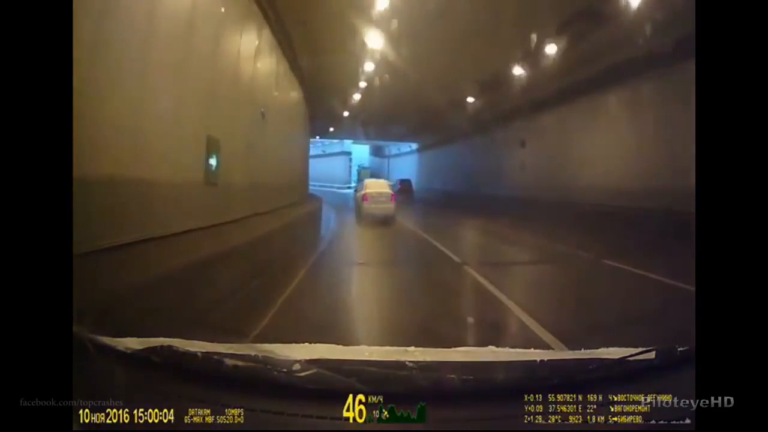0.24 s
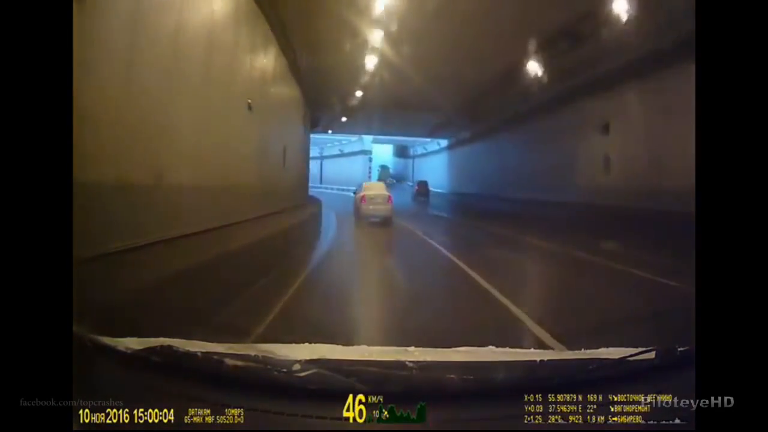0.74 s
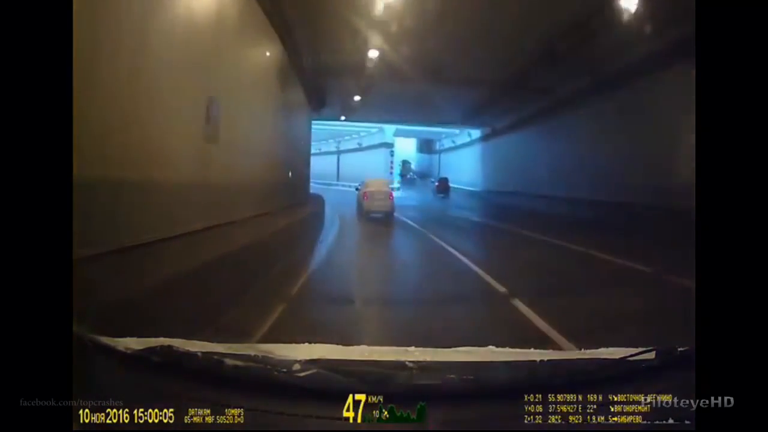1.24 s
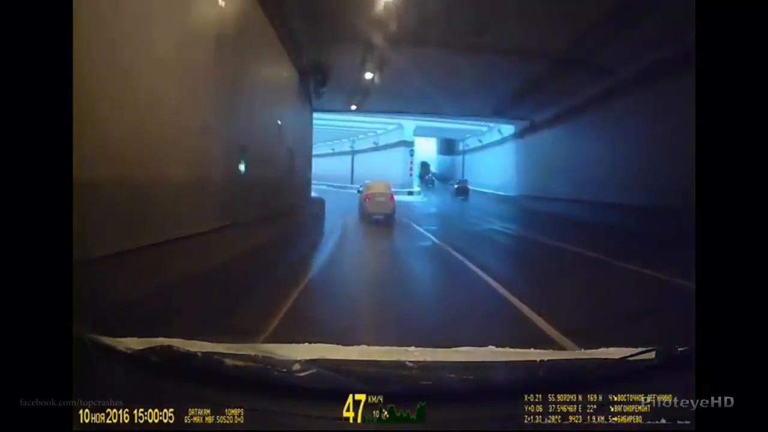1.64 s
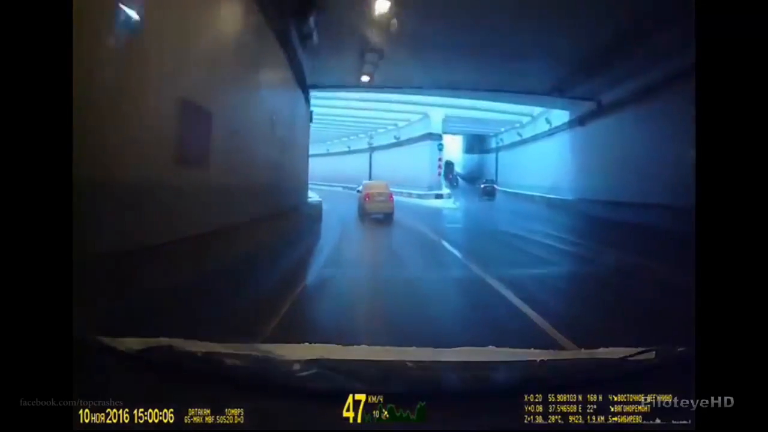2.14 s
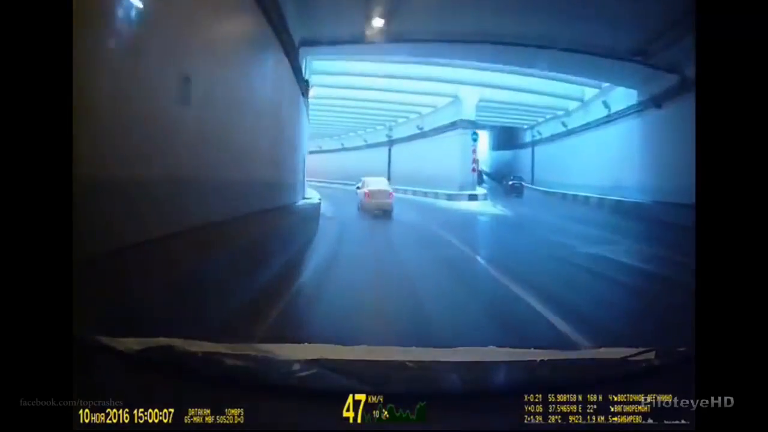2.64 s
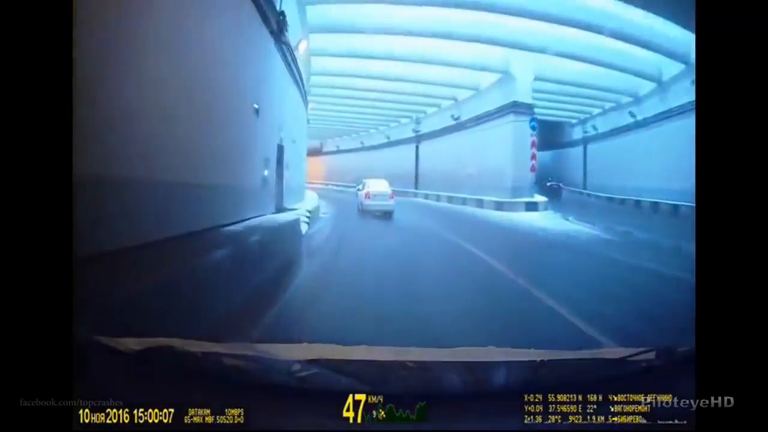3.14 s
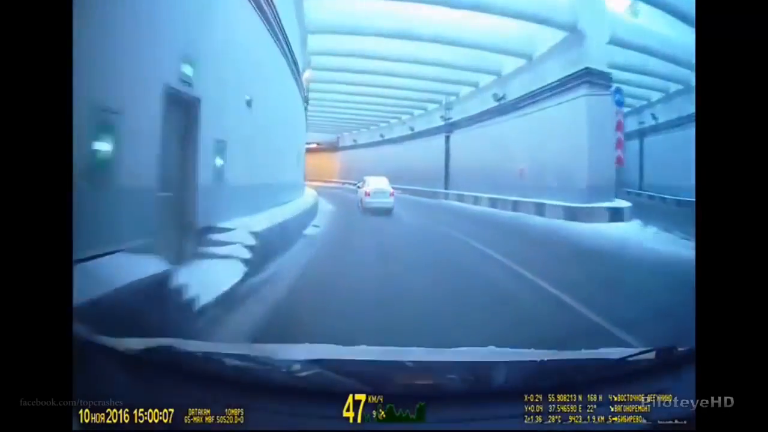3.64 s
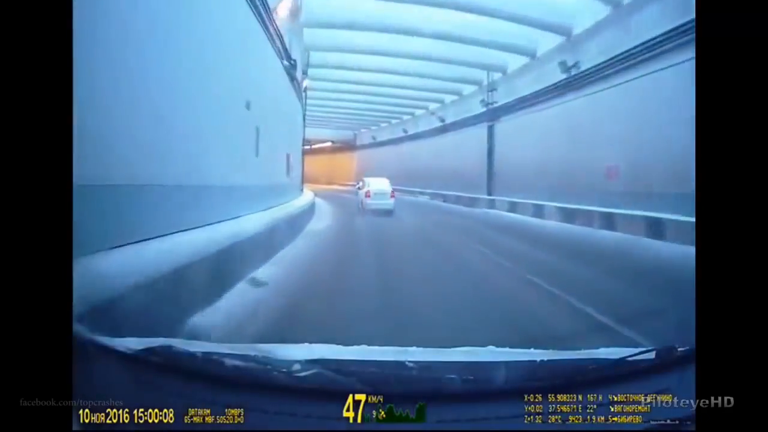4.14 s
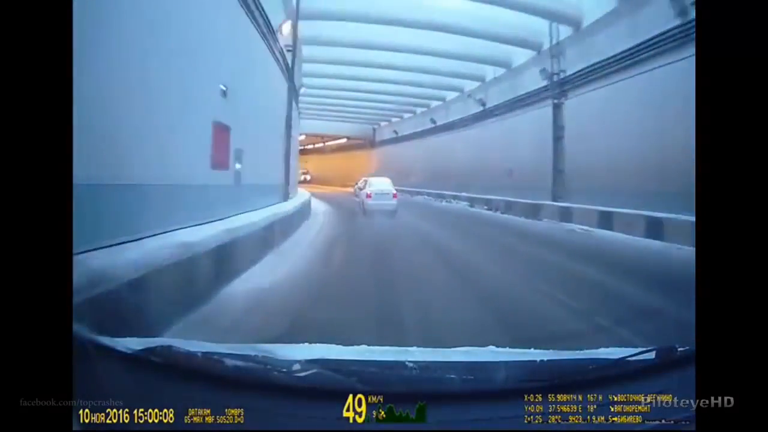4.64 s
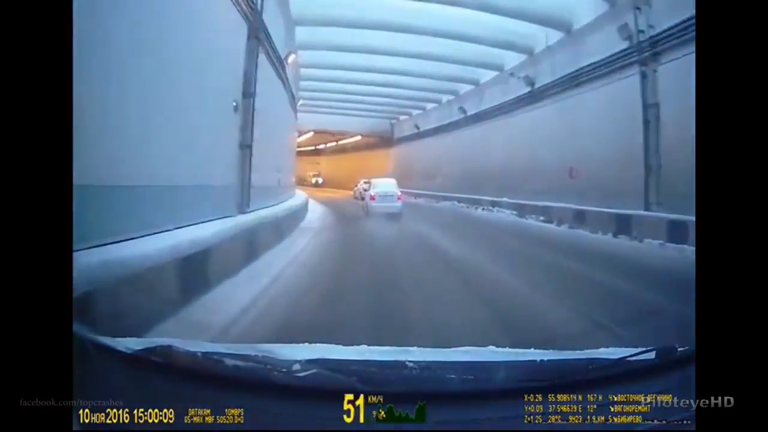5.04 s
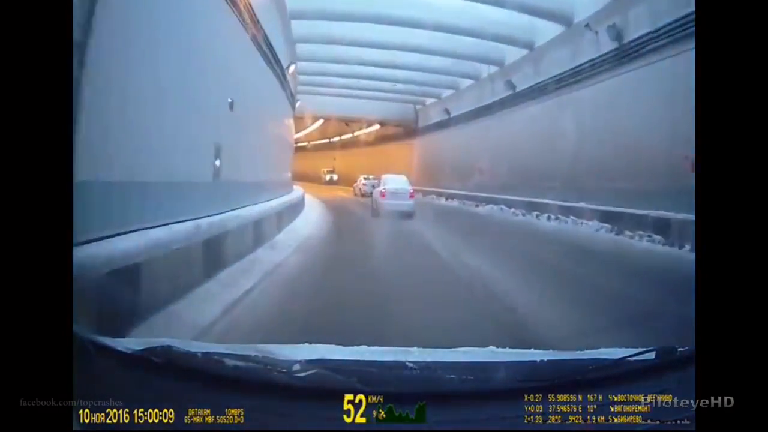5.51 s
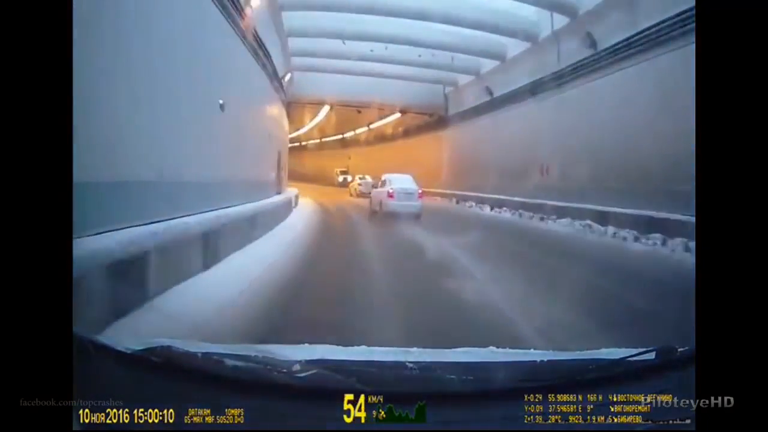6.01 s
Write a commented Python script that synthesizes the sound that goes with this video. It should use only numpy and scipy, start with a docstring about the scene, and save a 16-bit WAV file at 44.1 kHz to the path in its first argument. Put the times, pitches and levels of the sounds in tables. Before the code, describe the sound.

A car drives through a road tunnel for about six seconds, heard from inside the cabin. A bass-heavy, muffled tyre roar runs throughout, easing only very slightly. With it goes a deep engine hum that holds nearly the same pitch while slowly wavering in strength, and the cylinders tick faintly underneath. From about 0.8 to 1.4 seconds both axles cross a road joint: a quick cluster of around six knocks with briefly ringing floor panels, suspension thuds and light trim rattles. The clearest knock falls at 1 second and the heaviest thud near 1.3 seconds. From 1 second a faint, low, fluttering drivetrain whine rises gently in pitch, fading out by about 4 seconds. The rumble continues evenly, and a short, soft low thud sounds at about 6.2 seconds, right at the end.

```python
"""A deep, wavering hum and a tyre roar fill a car rolling through a road tunnel. The hum is engine
orders and steady body tones; the roar is broadband noise coloured by the cabin's resonances. The
cylinders tick faintly. About a second in, both axles knock over a road joint, ringing floor panels,
thudding the suspension and rattling the trim. A drivetrain whine rises in pitch and fades, and a
short, soft low thud sounds at the very end."""
import sys
import numpy as np
from scipy import signal
from scipy.io import wavfile

SR = 44100
rng = np.random.default_rng(int(sys.argv[2]) if len(sys.argv) > 2 else 0)


def file_out(sig):
    """Save sig as 16-bit WAV at sys.argv[1]."""
    # one column per channel
    cols = np.atleast_2d(sig).T
    # limit, then scale
    lim = np.clip(cols, -1, 1)
    pcm = np.round(lim * 32767).astype(np.int16)
    wavfile.write(sys.argv[1], SR, pcm)


N = 276434
TIME = np.arange(N) / SR


def amp(db):
    """Amplitude ratio: a factor of ten for every 20 dB."""
    return 10 ** (np.asarray(db) / 20)


def unit_rms(x):
    """Normalisation to a mean power of one."""
    return x / np.sqrt(np.mean(x ** 2) + 1e-20)


def drift(rate_hz):
    """Low-passed noise: a slow random fluctuation with a spread of one."""
    hop, settle = 40, 2000
    pole = np.exp(-2 * np.pi * rate_hz * hop / SR)
    noise = rng.standard_normal(N // hop + settle + 2)
    slow = signal.lfilter([1], [1, -2 * pole, pole * pole], noise)[settle:]
    return np.interp(np.arange(N) / hop, np.arange(len(slow)), unit_rms(slow - slow.mean()))


def tone(cycles, rms_db):
    """Simple harmonic motion from a random starting phase."""
    return np.sqrt(2) * amp(rms_db) * np.sin(2 * np.pi * (cycles + rng.random()))


def band(x, low_hz, high_hz):
    """Band limiting by a Butterworth filter."""
    return signal.sosfilt(signal.butter(2, [low_hz, high_hz], "band", fs=SR, output="sos"), x)


def cabin(x):
    """Resonance in an enclosure: the cabin reinforces some bands and weakens others."""
    # cabin peaks and dips: centre_hz, width_hz, gain_db
    resonances = [(65, 10, -3.5), (112.4, 15, -5.5), (89, 69, 7), (140, 18, 5), (471, 344, 4),
                  (516, 8.5, -9.5), (591, 70, 4.5), (958, 250, 7), (1728, 303, 6.5), (2090, 150, -6),
                  (2180, 440, 2.5), (2876, 660, 5.5)]
    for centre_hz, width_hz, gain_db in resonances:
        w, a = 2 * np.pi * centre_hz / SR, np.sqrt(amp(gain_db))
        damping = np.sin(w) * width_hz / centre_hz / 2
        numerator = [1 + damping * a, -2 * np.cos(w), 1 - damping * a]
        denominator = [1 + damping / a, -2 * np.cos(w), 1 - damping / a]
        x = signal.lfilter(numerator, denominator, x)
    return x


def tyre_roar(start_db=-41.1, fall_db_per_s=0.2, flicker_db=0.99):
    """Transmission through the body: bass-heavy noise whose third octaves flicker alone and together."""
    # roar spectrum ahead of the cabin resonances: frequency_hz, relative_density_db
    spectrum = [(8, -5), (35, -7), (60, -16), (110, -19.5), (180, -27), (350, -30), (700, -34.5),
                (1050, -42.5), (1350, -47), (2100, -44), (3000, -49), (4000, -54), (5200, -61), (9400, -63)]
    frequency_hz, density_db = np.transpose(spectrum)
    edges_hz = 8 * 2 ** np.arange(0, 10.4, 1 / 3)
    together = drift(8)
    white = rng.standard_normal((2, N + SR))  # an extra second lets the filters settle
    roar = np.zeros(N)
    for k, (low, high) in enumerate(zip(edges_hz, edges_hz[1:])):
        band_db = np.interp(np.log(low * high) / 2, np.log(frequency_hz), density_db)
        flicker = 0.5 * together + drift(7.8)
        roar += amp(band_db + flicker_db * flicker) * band(white[k % 2], low, high)[SR:]
    return amp(start_db - fall_db_per_s * TIME) * unit_rms(cabin(roar))


def engine_hum(cycles, body_hz=32.9, waver_db=1.5):
    """Forced vibration at multiples of the cycle rate; a nearby body tone beats with the second order."""
    # wavering of the two strongest orders: time_s, first_order_db, second_order_db
    contour = [(0, -38, -39), (0.8, -35, -36), (1.2, -49, -36), (1.7, -45, -35), (2.2, -35, -42),
               (2.9, -35, -41), (3.4, -48, -37), (4.0, -42, -40), (4.4, -35, -43), (5.2, -46, -41),
               (5.8, -45, -37), (6.27, -45, -36)]
    # weaker engine orders: cycle_multiple, rms_db
    orders = [(1.5, -46), (3, -54), (4, -55), (5, -65), (6, -55), (7, -57)]
    time_s, *levels = np.transpose(contour)
    first_db, second_db = (np.interp(TIME, time_s, db) for db in levels)
    hum = tone(cycles, first_db) + tone(2 * cycles, second_db)
    hum += tone(body_hz * TIME, second_db - 3 + waver_db * drift(1.5))
    return hum + sum(tone(k * cycles, db + waver_db * drift(0.76)) for k, db in orders)


def steady_tones(waver_db=1.5):
    """Amplitude modulation: low body tones and a faint whistle hold their pitch and waver in level."""
    # vibrations of the car body: pitch_hz, rms_db
    body_tones = [(10.47, -48), (12.05, -52), (17.05, -42), (37.5, -52)]
    # high whistle: pitch_hz, rms_db
    whistle = [(7920, -93)]
    return sum(tone(hz * TIME, db + waver_db * drift(0.95)) for hz, db in body_tones + whistle)


def drivetrain_whine(start_s=1, start_hz=130.6, rise_hz_per_s=8.2, level_db=-54.5):
    """A linear frequency sweep: one fluttering tone climbs as it fades in, holds and fades out."""
    attack_s, hold_s, release_s = 0.27, 1.53, 1.15
    envelope = np.interp(TIME, np.cumsum([start_s, attack_s, hold_s, release_s]), [0, 1, 1, 0])
    pitch_hz = start_hz + rise_hz_per_s * (TIME - start_s)
    return envelope * tone(np.cumsum(pitch_hz) / SR, level_db + 3.3 * drift(7.3))


def engine_ticks(cycles, gain_db=-51.5, scatter_db=1.5, decay_s=0.0011):
    """Impulsive excitation: each cylinder gives a decaying noise burst, one louder than the rest."""
    # tick strength of each cylinder in firing order: relative_db
    cylinders = [0, -14, -18, -11, -16]
    firing = np.floor(cycles * len(cylinders)).astype(int)
    onsets = np.flatnonzero(np.diff(firing))
    strength_db = np.array(cylinders)[firing[onsets + 1] % len(cylinders)]
    impulses = np.zeros(N)
    impulses[onsets] = amp(strength_db + scatter_db * rng.standard_normal(len(onsets)))
    envelope = signal.lfilter([1], [1, -np.exp(-1 / (decay_s * SR))], impulses)
    bursts = envelope * rng.standard_normal(N)
    return amp(gain_db) * (1.8 * band(bursts, 2300, 3700) + 0.35 * band(bursts, 3700, 7000))


def cushioned_blow(t, rise_s):
    """Critical damping: rubber takes a blow softly, so the envelope peaks at rise_s and dies away."""
    return t / rise_s * np.exp(1 - t / rise_s)


def road_joint(ring_s=0.06, rise_s=0.017, thud_hz=133.6, buzz_db=-66):
    """Impact excitation: each edge rings a floor panel, thuds the suspension and shakes the trim."""
    # wheels on the joint edges; the last row is a short, soft low thud at the very end:
    # start_s, ring_hz, ring_db, thud_db, rattle_gain_db, jingle_db
    impacts = [(0.785, 290, -52, -45, -49, -80), (0.83, 440, -56, -56, -51, -80),
               (1.0, 406.5, -37, -50, -48, -80), (1.05, 331, -50, -52, -48, -76),
               (1.088, 465, -46, -59, -52, -80), (1.285, 580, -62, -39.5, -54, -60),
               (6.17, 200, -52, -44, -58, -76)]
    knocks, noise = np.zeros(N), rng.standard_normal(N)
    rattle = cabin(unit_rms(band(noise, 164, 580)) + 0.25 * unit_rms(band(noise, 590, 2000)))
    buzz = unit_rms(cabin(band(noise, 1660, 1890)))
    jingle = unit_rms(band(band(noise, 1400, 4000), 1400, 4000))
    for start_s, ring_hz, ring_db, thud_db, rattle_db, jingle_db in impacts:
        t = np.maximum(TIME - start_s, 0)
        rollover = np.sin(np.pi * np.minimum(t / ring_s, 1))  # swells and dies as the tyre crosses
        panel = amp(ring_db) * np.sin(2 * np.pi * ring_hz * t)
        thud = amp(thud_db) * np.sin(2 * np.pi * thud_hz * t)
        trim = amp(rattle_db) * rattle + amp(buzz_db) * buzz + amp(jingle_db) * jingle
        knocks += rollover * panel + cushioned_blow(t, rise_s) * trim
        knocks += cushioned_blow(t, 1.4 * rise_s) * thud
    return knocks


def scene():
    """Superposition at one point in the cabin; hum and ticks share one slowly falling engine speed."""
    cycle_hz, sag_hz_per_s, loud_tick_s = 14.0, 0.013, 2.987
    cycles = np.cumsum(cycle_hz - sag_hz_per_s * TIME) / SR
    cycles -= cycles[int(loud_tick_s * SR)]  # the loudest cylinder fires at whole cycles
    driving = tyre_roar() + engine_hum(cycles) + steady_tones() + drivetrain_whine()
    return (driving + engine_ticks(cycles) + road_joint())[None]


def record(dry):
    """Band limiting: an elliptic low-pass cuts the top treble steeply."""
    cutoff_hz = 9400
    return signal.sosfilt(signal.ellip(12, 0.5, 60, cutoff_hz, fs=SR, output="sos"), dry)


dry = scene()
out = record(dry)
file_out(out)
```